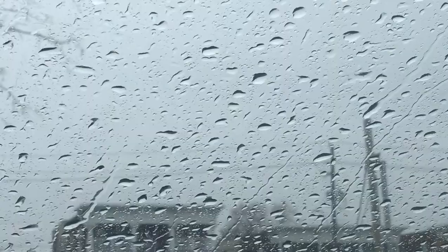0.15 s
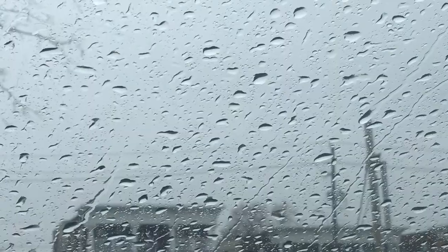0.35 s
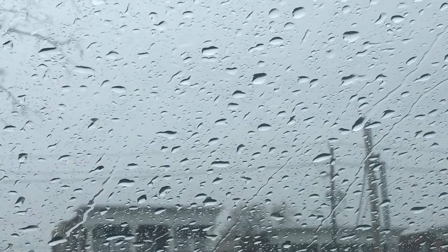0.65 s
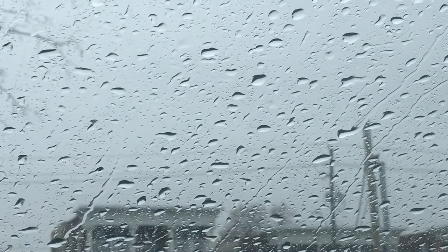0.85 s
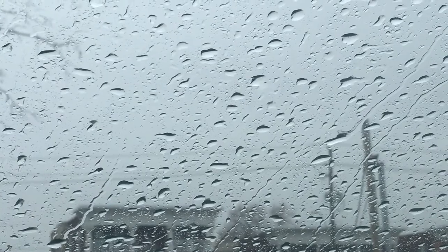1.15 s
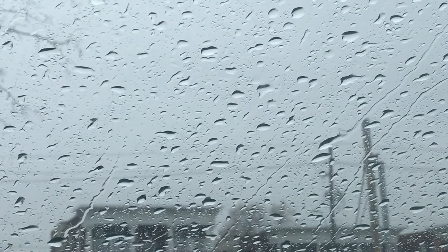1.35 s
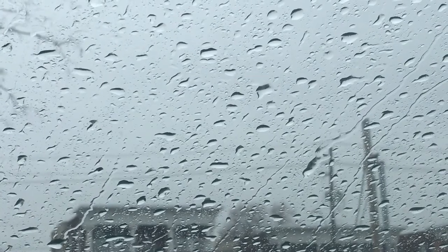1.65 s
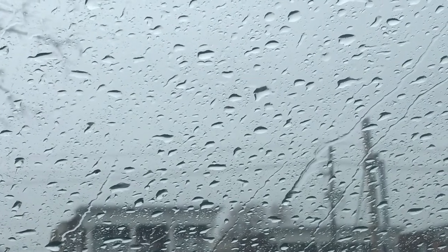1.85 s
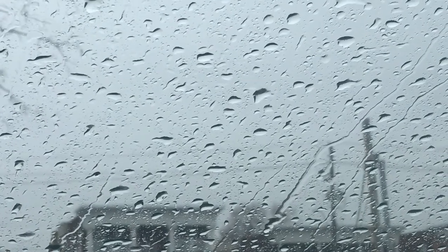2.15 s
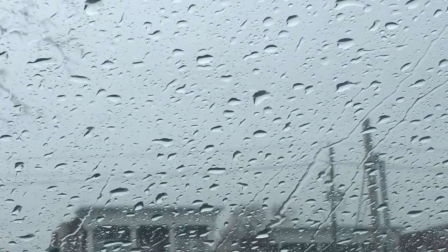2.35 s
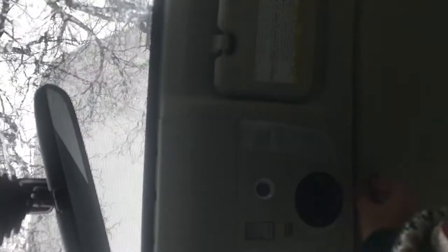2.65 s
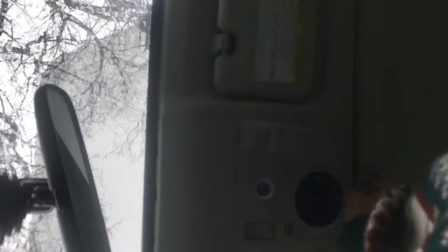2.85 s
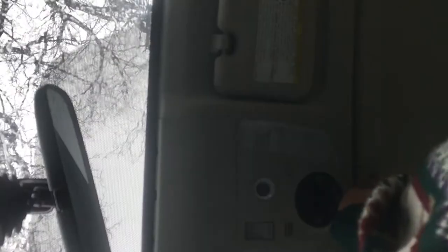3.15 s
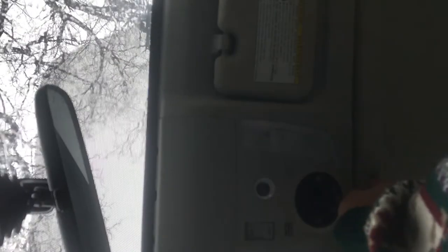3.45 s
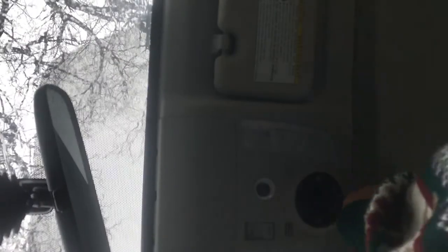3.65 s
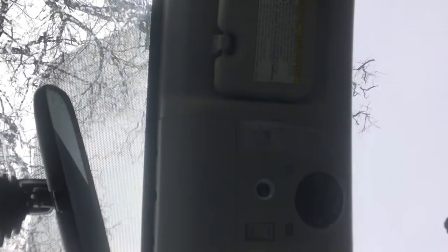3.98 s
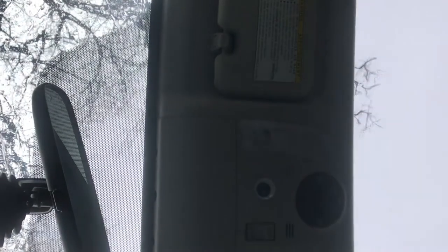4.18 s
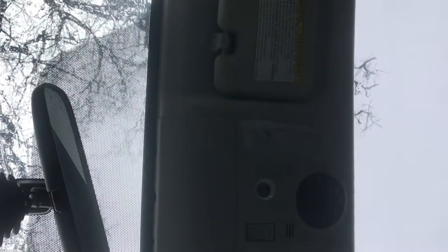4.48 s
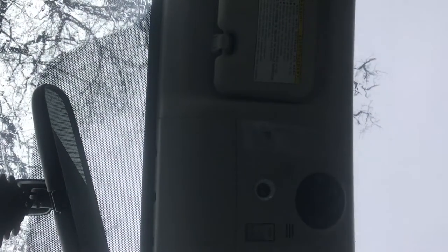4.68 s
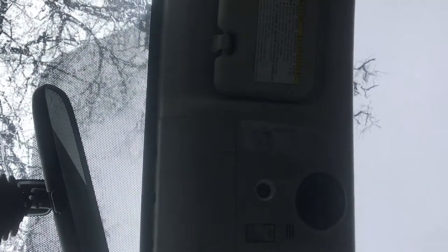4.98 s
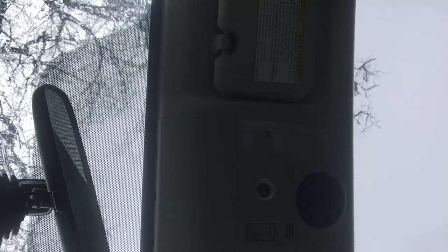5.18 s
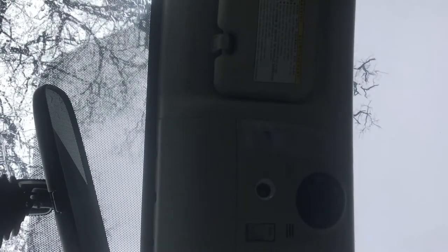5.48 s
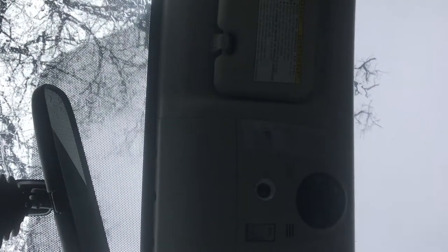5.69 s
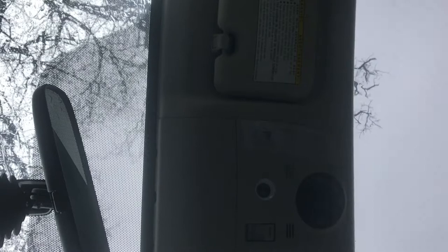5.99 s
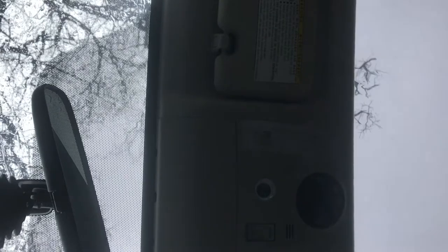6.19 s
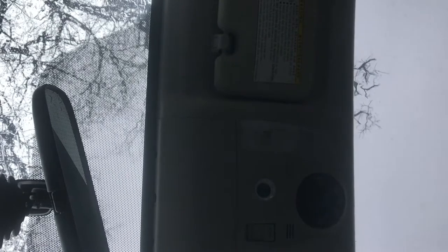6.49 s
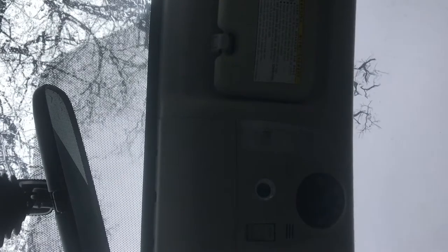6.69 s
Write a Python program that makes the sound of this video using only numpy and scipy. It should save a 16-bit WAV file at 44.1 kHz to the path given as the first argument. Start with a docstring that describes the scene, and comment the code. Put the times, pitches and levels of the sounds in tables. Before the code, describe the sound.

Inside an idling car, steady rain and fat drops tap the glass, a sliding shade hisses open and clacks to a stop, and the engine rises.

```python
"""Rain on a parked car, heard inside: noise bursts at random instants, filtered by glass, roof and cabin.
The engine idles beneath as phase-locked harmonics, a boom and low noise; distant tyres swish as filtered noise.
We listen behind the windscreen, where heavy drops ring modes of the glass, then, after a short silence, under
the roof, where the sunroof shade is unlatched, slides back with a frictional hiss and knocks into its stop.
At the end the engine gains speed and its boom grows in the cabin."""
import sys
import numpy as np
from scipy import signal
from scipy.fft import rfft, irfft
from scipy.io import wavfile

SR = 44100
rng = np.random.default_rng(int(sys.argv[2]) if len(sys.argv) > 2 else 0)


def store_pcm(level_fs):
    """Save levels as 16-bit WAV."""
    pcm = np.round(np.clip(level_fs, -1, 1) * 32767).astype(np.int16)
    wavfile.write(sys.argv[1], SR, np.atleast_2d(pcm).T)


N = 301203
TIME = np.arange(N) / SR
BURST_TIME = TIME[:SR // 8]  # span of one contact or ringing mode


def from_db(db):
    """Logarithmic level: decibels to amplitude gain."""
    return 10 ** (np.asarray(db) / 20)


def rms_one(x):
    """Normalisation by mean power: scale to rms 1."""
    return x / np.sqrt(np.mean(x ** 2) + 1e-20)


def drift(rate):
    """Slow random modulation: straight lines between `rate` random knots per second, scaled to rms 1."""
    knots = rng.standard_normal(4096)
    return rms_one(np.interp(TIME * rate, np.arange(len(knots)), knots))


def ramp(start, length):
    """Linear transition: from 0 at start to 1 after length seconds."""
    return np.clip((TIME - start) / max(length, 1e-3), 0, 1)


def swell(start, rise, end, fall):
    """Amplitude envelope: attack, hold and release, as a gain."""
    return ramp(start, rise) * (1 - ramp(end, fall))


def colour(x, spectrum, resonances=(), size=8192):
    """Minimum-phase filtering: a causal filter of unit power gain, with steep skirts beyond the spectrum."""
    hz = np.maximum(np.arange(size // 2 + 1) * SR / size, 1)
    points, levels = np.transpose(spectrum)
    octaves_beyond = np.abs(np.log2(hz / np.clip(hz, points[0], points[-1])))
    skirt_db = np.minimum(30 * octaves_beyond, 60)
    db = np.interp(np.log(hz), np.log(points), levels) - skirt_db
    for centre, width, lift in resonances:
        db = db + lift / (1 + (2 * (hz - centre) / width) ** 2)
    # folding the cepstrum onto positive time makes the phase minimal
    cepstrum = irfft(np.log(rms_one(from_db(db))))
    cepstrum[1:size // 2] *= 2
    cepstrum[size // 2 + 1:] = 0
    response = irfft(np.exp(rfft(cepstrum)))[:size // 2]
    return signal.oaconvolve(x, response)[:len(x)]


def grains(per_s, spread_db):
    """Poisson-like impulse process: clicks at random moments, of which big ones are rare."""
    chance = rng.random(N) * SR / per_s
    at = np.flatnonzero(chance < 1)
    rarity = np.minimum(-np.log(chance[at]), 3.5)
    hits = np.zeros(N)
    hits[at] = from_db(spread_db * rarity) * (-1.0) ** at
    return hits


def impact(crack_t60, tail_t60, tail_db):
    """Impulsive contact: noise with a short crack, then the cabin's dense reflections, both exponential."""
    crack = from_db(-60 * BURST_TIME / crack_t60)
    tail = from_db(tail_db - 60 * BURST_TIME / tail_t60)
    return rng.standard_normal(len(BURST_TIME)) * (crack + tail)


def mode(hz, t60, build_up_s):
    """Modal vibration: a sine that takes a moment to fill, then decays exponentially."""
    envelope = (1 - np.exp(-BURST_TIME / build_up_s)) * from_db(-60 * BURST_TIME / t60)
    return envelope * np.sin(2 * np.pi * (hz * BURST_TIME + rng.random()))


def add(out, s, sound):
    """Superposition: mix a sound in at time s."""
    at = int(s * SR)
    out[at:at + len(sound)] += sound[:N - at]


def patter(per_s, spread_db, tail_db, count):
    """Random impacts convolved with responses: drops land on several spots, each its own; rms 1."""
    total = np.zeros(N)
    for _ in range(count):
        hits = grains(per_s / count, spread_db)
        total += signal.oaconvolve(hits, impact(0.0041, 0.078, tail_db))[:N]
    return rms_one(total)


# steady rain in each place, and the spread of its slow gusting
SCREEN_RAIN_DB, ROOF_RAIN_DB, GUST_DB = -46.5, -43.5, 0.23
# spectrum of the rain in each place: f/Hz, density level/dB
SCREEN_RAIN_SPECTRUM = [(200, -15), (280, -9.5), (400, -11.5), (480, -8.5), (580, -13.5), (720, -10.5),
                        (900, -21), (1100, -18), (2280, -25), (2950, -28), (3800, -32.5), (6000, -38.5),
                        (9000, -40), (15500, -44.5)]
ROOF_RAIN_SPECTRUM = [(200, -22), (280, -2.5), (335, -5), (415, -4.5), (670, -7.5), (900, -13), (1310, -17),
                      (1840, -19.5), (2750, -26), (3600, -28), (5660, -35), (9000, -38), (15500, -43.5)]
# resonances of cabin and microphone port, shared by rain and shade: f/Hz, width/Hz, level/dB
CABIN_RESONANCES = [(259, 57, -11), (463, 31, 3), (865, 106, 5.5), (1395, 82, -3), (1720, 670, 2.5),
                    (2720, 71, 6.5), (4820, 260, -6), (7770, 900, -4.5), (10360, 1050, -5)]
# spectrum of a drop's tick: f/Hz, density level/dB
TICK_SPECTRUM = [(1200, -4.5), (2600, 2.5), (3800, 3), (6300, -5.5), (9000, -15), (15000, -21)]
# spectra of fine spray on windscreen and sunroof: f/Hz, density level/dB
SCREEN_SPRAY_SPECTRUM = [(2800, -15), (4000, 4), (6300, 7), (9000, -1), (15000, -10)]
ROOF_SPRAY_SPECTRUM = [(4000, -30), (6000, -9), (8300, 0), (9500, -3), (11000, -16), (15000, -24)]


def rain(under_roof):
    """Shot noise: many small impacts fuse into a dense wash, with sparser ticks and fine spray over it."""
    wash = patter(per_s=1900, spread_db=0.5, tail_db=-6.0, count=28)
    screen = from_db(SCREEN_RAIN_DB) * colour(wash, SCREEN_RAIN_SPECTRUM, CABIN_RESONANCES)
    roof = from_db(ROOF_RAIN_DB) * colour(wash, ROOF_RAIN_SPECTRUM, CABIN_RESONANCES)
    ticks = from_db(-63.5) * colour(patter(per_s=62, spread_db=2.0, tail_db=14, count=4), TICK_SPECTRUM)
    droplets = patter(per_s=22, spread_db=2.2, tail_db=-16, count=3)
    screen_spray = from_db(-74.5) * colour(droplets, SCREEN_SPRAY_SPECTRUM)
    roof_spray = from_db(-80) * colour(droplets, ROOF_SPRAY_SPECTRUM)
    spray = np.where(under_roof, roof_spray, screen_spray)
    gusting = from_db(GUST_DB * drift(2.25))
    return gusting * np.where(under_roof, roof, screen) + ticks + spray


# the engine idles, then gains speed at a steady rate (firings per s)
IDLE_HZ, PICK_UP_S, PICK_UP_HZ_PER_S = 43.22, 5.88, 5.6
# boom at idle in each place, its growth per Hz above idle, and its slow wander
SCREEN_BOOM_DB, ROOF_BOOM_DB, BOOM_DB_PER_HZ, BOOM_WANDER_DB = -27.5, -31.5, 2.5, 0.74
# shaking of the body in each place
SCREEN_RUMBLE_DB, ROOF_RUMBLE_DB = -34, -41.5
# a last surge of load lifts boom and rumble together
SURGE_S, SURGE_RISE_S, SURGE_BOOM_DB, SURGE_RUMBLE_DB = 6.625, 0.035, 2.5, 8.5
# under load one cylinder fires harder, so the boom throbs once in four firings until the surge
THROB_DB, THROB_RISE_S = 2.0, .3
# engine harmonics at idle in each place: multiple of the firing rate, rms level/dB
SCREEN_HARMONICS = [(2, -49.5), (3, -37.3), (5, -51), (9, -56)]
ROOF_HARMONICS = [(2, -52.5), (3, -62.5), (4, -54.5), (5, -48.5), (7, -62), (7.5, -55), (8, -54.5),
                  (8.5, -56), (9, -59.5), (11, -55)]
# whine of the belt-driven parts at idle: f/Hz, rms level/dB
BELT_WHINE = [(623.5, -62), (846, -59.5), (2680, -70), (2820, -70)]
# spectrum of the body's rumble in each place: f/Hz, density level/dB
SCREEN_RUMBLE_SPECTRUM = [(32, -23.5), (55, -4.5), (70, -15), (95, -9.5), (128, -7), (188, -20), (266, -23),
                          (330, -24.5)]
ROOF_RUMBLE_SPECTRUM = [(30, -12), (60, -2.5), (78, -4.5), (100, -3), (125, 0), (165, -6.5), (205, -9.5),
                        (245, -19), (330, -25)]
# cabin resonances on the roof rumble: f/Hz, width/Hz, level/dB
BOOM_RESONANCES = [(75.4, 3.2, 13), (230, 23, 6)]


def engine(under_roof):
    """Harmonic series: boom, harmonics and whine follow one speed; amplitude-modulated noise rumbles below."""
    above_idle = PICK_UP_HZ_PER_S * np.maximum(TIME - PICK_UP_S, 0)
    speed = IDLE_HZ + above_idle
    surge = ramp(SURGE_S, SURGE_RISE_S)
    phase = 2 * np.pi * np.cumsum(speed * (1 + 0.0037 * drift(9))) / SR
    buzz = np.zeros(N)
    for harmonics, share in ((SCREEN_HARMONICS, 1 - under_roof), (ROOF_HARMONICS, under_roof)):
        for k, db in harmonics:
            # no two firings are alike, which blurs the high harmonics most
            wander = 0.039 * k * drift(14)
            level = from_db(db + 0.27 * k * drift(12))
            buzz += share * level * np.sin(k * phase + wander + 2 * np.pi * rng.random())
    belt_seconds = np.cumsum(speed / IDLE_HZ) / SR  # the belt smooths the jitter of single firings
    for hz, db in BELT_WHINE:
        buzz += from_db(db + 1.0 * drift(8.6)) * np.sin(2 * np.pi * hz * belt_seconds)
    # harmonics and whine weaken by 3 dB per Hz above idle
    buzz *= from_db(-3 * above_idle)
    boom_db = np.where(under_roof, ROOF_BOOM_DB, SCREEN_BOOM_DB)
    boom_db = boom_db + BOOM_DB_PER_HZ * above_idle + SURGE_BOOM_DB * surge
    throb_db = THROB_DB * ramp(PICK_UP_S, THROB_RISE_S) * (1 - surge) * np.sin(phase / 4)
    wander_db = BOOM_WANDER_DB * drift(3.0) + .5 * drift(30)
    boom = from_db(boom_db + throb_db + wander_db) * np.sin(phase)
    # uneven combustion shakes the body as a low rumble
    shake = rng.standard_normal(N) * (1 + 0.17 * np.sin(phase))
    screen = from_db(SCREEN_RUMBLE_DB) * colour(shake, SCREEN_RUMBLE_SPECTRUM)
    roof = from_db(ROOF_RUMBLE_DB) * colour(shake, ROOF_RUMBLE_SPECTRUM, BOOM_RESONANCES)
    rumble = from_db(SURGE_RUMBLE_DB * surge) * np.where(under_roof, roof, screen)
    return np.sqrt(2) * (boom + buzz) + rumble  # root 2 turns rms levels into sine peaks


# a hit on the near glass is short and dry, one on the roof spreads through the lining:
# t60 of its crack, and level of its tail relative to that crack
GLASS_CRACK_S, ROOF_CRACK_S = .0045, .013
GLASS_TAIL_DB, ROOF_TAIL_DB = -6, -0.5
# the spot rings with a close pair of modes
SPOT_RING_DB, SPOT_T60_S, SPOT_PAIR_RATIO, SPOT_PAIR_DB = -1, 0.1, 1.17, -11
# spectra of a hit's knock and splash: f/Hz, density level/dB
KNOCK_SPECTRUM = [(300, -22), (600, 7), (950, 6), (1800, -1), (3000, -10.5), (6000, -46)]
SPLASH_SPECTRUM = [(4000, -15), (8300, 0.5), (10400, -7), (12000, -4), (15500, -10)]


def single_hit(s, body_db, splash_db, spot_hz):
    """Impact excitation: a knock sets the spot's modes ringing, with a tick and a fine splash of noise."""
    on_roof = s > PAUSES[1][0]
    crack_s, tail_db = (ROOF_CRACK_S, ROOF_TAIL_DB) if on_roof else (GLASS_CRACK_S, GLASS_TAIL_DB)
    knock = from_db(-16) * colour(impact(0.042, 0.19, 2.0), KNOCK_SPECTRUM, size=1024)
    ring = mode(spot_hz, SPOT_T60_S, 0.0022)
    ring = ring + from_db(SPOT_PAIR_DB) * mode(spot_hz * SPOT_PAIR_RATIO, SPOT_T60_S, 0.002)
    tick = from_db(-10.0) * colour(impact(2 * crack_s, 0.16, tail_db), TICK_SPECTRUM, size=512)
    splash = colour(impact(crack_s, 0.19, tail_db - 10.5), SPLASH_SPECTRUM, size=256)
    body = from_db(body_db) * (knock + from_db(SPOT_RING_DB) * ring)
    return body + tick + from_db(splash_db - 6.5) * splash


# lighter drops: mean rate, mean level and its spread, body and splash relative to that level
LIGHT_DROPS_PER_S, LIGHT_DROP_DB, LIGHT_SPREAD_DB, LIGHT_BODY_DB, LIGHT_SPLASH_DB = 3, -54, 2.2, 1, -11
# they ring near one pitch, a little different at each spot
PANE_HZ, PANE_SPREAD_OCTAVES = 930, 0.086


def light_drops(count=36):
    """Renewal process: lighter drops from the branches fall at uneven gaps and ring their spots unequally."""
    out = np.zeros(N)
    times = np.cumsum(rng.gamma(2, .5, count)) / LIGHT_DROPS_PER_S
    for s, (size, body, spot) in zip(times[times < TIME[-1]], rng.standard_normal((count, 3))):
        body_db = LIGHT_BODY_DB + LIGHT_SPREAD_DB * body
        spot_hz = PANE_HZ * 2 ** (PANE_SPREAD_OCTAVES * spot)
        sound = single_hit(s, body_db, LIGHT_SPLASH_DB, spot_hz)
        add(out, s, from_db(LIGHT_DROP_DB + LIGHT_SPREAD_DB * size) * sound)
    return out


# the heaviest drops, and at 4.107 s the sliding shade catching on its rail:
# t/s, overall level/dB, then body level/dB and splash level/dB relative to it
# (each before the trims in single_hit), ring of the spot that is hit f/Hz
HEAVY_HITS = [(0.2216, -40, -2.5, -19, 770), (0.232, -42, -6, -22, 910), (0.2889, -45, -7, -10, 870),
              (0.4969, -44, -8, -16, 880), (0.5347, -39, -10, -26, 1660), (1.0045, -44, 2, -16, 850),
              (1.1533, -40, -9, -24, 900), (1.1583, -39.5, -10, -12, 1820), (1.2938, -40, -7, -22, 880),
              (1.4022, -37.5, -6, -6, 1690), (1.415, -37, -9, -16, 1920), (1.4172, -38, -8, -18, 1900),
              (1.4936, -43, 1, -1, 910), (1.5243, -37.5, -12, -6, 900), (1.576, -42, -9, -10, 900),
              (1.6227, -39, -12, -22, 900), (1.7465, -44, -8, -12, 900), (1.7587, -36, -0.5, 1.5, 700),
              (1.781, -43, -8, -16, 900), (1.803, -46, -8, -8, 900), (1.807, -41, -6, -4, 900),
              (1.848, -42, -7, -14, 900), (1.9904, -39, -6, -10, 1080), (2.3026, -39.5, -5, -20, 990),
              (2.454, -38, -8, -19, 1170), (3.0967, -48, -6, -22, 890), (3.161, -46, -8, -21, 810),
              (4.107, -40.5, 2, -12, 906), (4.655, -46, -11, -24, 900), (4.89, -43.5, -14, -28, 900),
              (5.0402, -43.5, 2, -20, 1550), (5.05, -44, 0, -20, 1800), (5.1576, -41, 0, -6, 900),
              (5.212, -44, 1, -12, 900), (5.217, -37, 0, -9, 908), (5.5275, -42, -1, -18, 914),
              (5.5688, -42.5, -8, -24, 900), (5.7163, -40.5, 7, -7, 965), (5.7713, -46.5, 10, -6, 850),
              (5.784, -56, 10.5, -22, 1830), (5.829, -49, 8, -18, 945), (5.866, -45, -7, -18, 905),
              (6.204, -41.5, -7, -19, 910), (6.211, -46, -9, -20, 900), (6.221, -47, -9, -20, 900),
              (6.405, -44, -10, -20, 900), (6.518, -40, -15, -8, 900), (6.8044, -44.5, 5, -1, 990)]


def heavy_hits():
    """Superposed transients: fat drops from the branches, and one catch of the shade on its rail, stand out."""
    out = np.zeros(N)
    for s, db, body_db, splash_db, spot_hz in HEAVY_HITS:
        add(out, s, from_db(db) * single_hit(s, body_db, splash_db, spot_hz))
    return out


# cars passing on a wet road some way off: start t/s, approach/s, end t/s, level/dB
PASSING_CARS = [(1.5, 0.3, 2.62, -53), (5.7, 1.5, 7.9, -51.5)]
# tyre noise through the glass: f/Hz, density level/dB
TYRE_SPECTRUM = [(600, -15), (900, -6), (1150, -2), (1400, -8.5), (1800, -13.5), (2600, -23)]


def traffic():
    """Broadband noise under an envelope: far tyres swish on wet asphalt, swelling as each car nears."""
    nearness = sum(from_db(db) * swell(s, approach, end, fall=.03) for s, approach, end, db in PASSING_CARS)
    return nearness * colour(rng.standard_normal(N), TYRE_SPECTRUM)


# the place of a knock favours the modes near one pitch
FAVOUR_DB, FAVOUR_OCTAVES = 5, 0.25
# the first snap of a knock: level relative to its clack, and decay
SNAP_DB, SNAP_T60_S = -2, .011
# the touching part rings briefly and cleanly: level relative to its clack, and cycles to fall 60 dB
PART_RING_DB, PART_CYCLES = -1.5, 160
# knocks of the shade: t/s, clack level/dB, panel level/dB, thump level/dB (clack and panel before trims),
# ring of the touching part f/Hz, top of the clack f/Hz, panel mode hit hardest f/Hz
SHADE_KNOCKS = [(2.6655, -39.5, -50, -50, 4330, 15000, 800), (2.668, -43, -32, -35, 1380, 14000, 800),
                (2.672, -41.5, -31, -32, 2240, 15000, 541), (2.6775, -37.5, -29.5, -30, 1524, 15000, 790),
                (2.706, -43.5, -34.5, -33, 4370, 9000, 550), (4.403, -24.5, -47, -43, 3450, 4800, 950),
                (4.407, -35, -35, -50, 3750, 13000, 1734), (4.412, -34.5, -40, -42, 2750, 6000, 1730),
                (4.4145, -35, -36, -49, 4930, 14000, 1730), (4.423, -33.5, -40, -24.5, 6440, 14000, 950),
                (4.431, -44, -33.5, -26, 6300, 9000, 920), (4.44, -60, -31, -23.5, 1700, 7000, 300),
                (4.458, -43, -46, -57, 6940, 12000, 930), (4.462, -42, -39, -60, 7150, 15000, 930),
                (4.490, -32, -34, -33, 3450, 14000, 930), (4.495, -39, -34.5, -29.5, 5100, 9000, 544),
                (4.5729, -35.5, -35.5, -43, 3680, 15000, 950)]
# modes of the shade panel: f/Hz, level/dB, t60/s
PANEL_MODES = [(199, 5, 0.11), (284, -1, 0.093), (336, -3, 0.095), (410, 4, 0.065), (539, 5, 0.096),
               (700, 4, 0.038), (785, 2, 0.083), (914, -0.5, 0.12), (1034, 1, 0.042), (1220, -2.5, 0.035),
               (1356, -10.5, 0.081), (1551, -9, 0.12), (1726, -24, .07), (2236, -6, 0.05)]
# spectra of the plastic catch and the roof lining: f/Hz, density level/dB
CLACK_SPECTRUM = [(500, 3), (1200, -2), (2300, -3), (3500, 3.5), (4600, -3), (6400, -6), (8300, -12),
                  (10400, -12), (12500, -10), (15500, -17)]
THUMP_SPECTRUM = [(25, -39), (52, 13), (90, -8), (150, -1), (300, -12.5), (600, -14), (1200, -47),
                  (2000, -37)]
# resonances of the catch: f/Hz, width/Hz, level/dB
CATCH_RESONANCES = [(1734, 250, 11.5), (2700, 140, 2), (3540, 360, 1), (4400, 300, -3), (5100, 200, 2),
                    (5700, 350, -2), (6180, 220, 6), (8660, 330, 9)]


def shade_knocks():
    """Modal excitation by impact: each knock clacks the catch, rings the panel and thumps the lining."""
    out = np.zeros(N)
    for s, clack_db, panel_db, thump_db, ring_hz, top_hz, favoured_hz in SHADE_KNOCKS:
        panel = 0
        for hz, db, t60 in PANEL_MODES:
            favour_db = FAVOUR_DB * np.exp(-(np.log2(hz / favoured_hz) / FAVOUR_OCTAVES) ** 2)
            panel = panel + from_db(db + favour_db + rng.normal()) * mode(hz, t60, 0.0016)
        contact = impact(0.039, 0.1, -14.0) + from_db(SNAP_DB) * impact(SNAP_T60_S, .03, -30)
        clack = colour(contact, CLACK_SPECTRUM, CATCH_RESONANCES, size=2048)
        # softer contacts are duller
        clack = signal.sosfilt(signal.butter(2, top_hz, fs=SR, output="sos"), clack)
        clack = clack + from_db(PART_RING_DB) * mode(ring_hz, PART_CYCLES / ring_hz, 0.00018)
        thump = colour(impact(.07, .18, -14), THUMP_SPECTRUM)
        knock = from_db(clack_db - 3.5) * clack + from_db(panel_db - 7.5) * panel
        add(out, s, knock + from_db(thump_db) * thump)
    return out


# one push of the shade: the rubbing rises, then sags until it stops
SLIDE_START_S, SLIDE_RISE_S, SLIDE_STOP_S, SLIDE_FALL_S = 3.42, 0.29, 4.41, 0.17
SLIDE_DB, SLIDE_SAG_DB_PER_S = -44.5, 3.5
# part-way along, the rubbing shifts from its shut towards its open colour
OPENING_S, OPENING_LASTS_S = 3.81, .13
# near the end of its travel the shade runs more freely
FREE_S, FREE_DB = 4.11, -2.5
# the weave snags on the rails: coarse grains per s, and their level relative to the fine friction
SNAGS_PER_S, SNAG_DB = 260, -12.5
# sharpness of the rail resonances, and the spread and rate of their wavering
RAIL_Q, RAIL_WAVER_DB, RAIL_WAVERS_PER_S = 8, 1.6, 22
GROAN_DB = -44.5
# rubbing with the shade nearly shut and nearly open: f/Hz, density level/dB
SHUT_SPECTRUM = [(900, -7), (1700, -9), (2400, -10.5), (3700, -6), (4800, -10), (5700, -8), (7000, -12.5),
                 (8500, -11), (10300, -13), (11300, -8), (12600, -10.5), (15500, -20)]
OPEN_SPECTRUM = [(900, -6), (1700, -10), (2700, -8), (3600, -6), (4800, -11), (6000, -4), (7000, 2),
                 (7800, -3.5), (9400, -7.5), (10400, -9), (12200, -9), (13500, -13), (15500, -17)]
# resonances of the rails, which come and go with the pressure on them: f/Hz
RAIL_RESONANCES = [3700, 5700, 7000, 8900, 11400, 12700]
# the weave catches on a rail with a sharp tick: t/s, level/dB before a trim
WEAVE_CATCHES = [(3.934, -36), (4.0056, -39)]
# half-way the shade binds briefly and its panel groans: start t/s, rise/s, end t/s, fall/s
BINDING_ENVELOPE = (3.80, .04, 3.855, .03)
# spectrum of that groan: f/Hz, density level/dB
GROAN_SPECTRUM = [(550, -3), (800, 2), (1300, -3), (1900, -5), (2600, -17), (3800, -8)]


def shade_slide():
    """Friction as dense random slips: fabric edges rub and snag along resonant rails, and the panel binds once."""
    push = swell(SLIDE_START_S, SLIDE_RISE_S, SLIDE_STOP_S, SLIDE_FALL_S) ** 2
    sag_db = SLIDE_SAG_DB_PER_S * np.maximum(TIME - SLIDE_START_S - SLIDE_RISE_S, 0)
    rub_db = SLIDE_DB - sag_db + FREE_DB * ramp(FREE_S, 0.02)
    # share of the open colour; the shade rocks as it goes
    opening = np.clip(0.092 + 0.47 * ramp(OPENING_S, OPENING_LASTS_S) + 0.15 * drift(24.3), 0, 1)
    fine = rms_one(grains(per_s=17000, spread_db=2.5))
    snags = rms_one(grains(SNAGS_PER_S, spread_db=0.0))
    friction = rms_one(fine + from_db(SNAG_DB) * snags)
    shut = colour(friction, SHUT_SPECTRUM, CABIN_RESONANCES)
    opened = colour(friction, OPEN_SPECTRUM, CABIN_RESONANCES)
    grip_db = 0.64 * drift(40)  # the rails do not grip evenly
    rubbing = push * from_db(rub_db + grip_db) * ((1 - opening) * shut + opening * opened)
    for hz in RAIL_RESONANCES:
        resonance = signal.lfilter(*signal.iirpeak(hz, RAIL_Q, fs=SR), rubbing)
        waver = from_db(RAIL_WAVER_DB * drift(RAIL_WAVERS_PER_S))
        rubbing = rubbing + (waver - 1) * resonance
    for s, db in WEAVE_CATCHES:
        add(rubbing, s, from_db(db - 13) * colour(impact(.03, .06, -15), OPEN_SPECTRUM, size=1024))
    slips = rms_one(grains(per_s=700, spread_db=2.5))
    groan = swell(*BINDING_ENVELOPE) * colour(slips, GROAN_SPECTRUM, CABIN_RESONANCES)
    return rubbing + from_db(GROAN_DB) * groan


def scene():
    """Linear superposition at one microphone, first behind the windscreen, then under the roof."""
    under_roof = (TIME > PAUSES[1][0]) * 1.0
    inside = engine(under_roof) + shade_slide() + shade_knocks()
    return (inside + traffic() + rain(under_roof) + heavy_hits() + light_drops())[None]


CUTOFF_HZ, EDGE_S, FADE_IN_S = 15750, .004, 0.0078
# silences before each place is heard: start t/s, end t/s
PAUSES = [(.013, .048), (2.616, 2.651)]


def record(dry):
    """Gating and band limitation: each place fades in after a short silence; a steep low-pass cuts the top."""
    running = swell(0, EDGE_S, TIME[-1] - EDGE_S, EDGE_S)
    for start, end in PAUSES:
        running = running * (1 - swell(start, 0, end, FADE_IN_S))
    low_pass = signal.ellip(12, .1, 90, CUTOFF_HZ, fs=SR, output="sos")
    return signal.sosfilt(low_pass, dry * running)


dry = scene()
out = record(dry)
store_pcm(out)
```